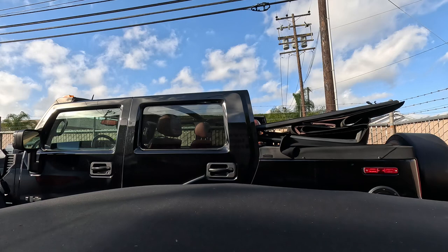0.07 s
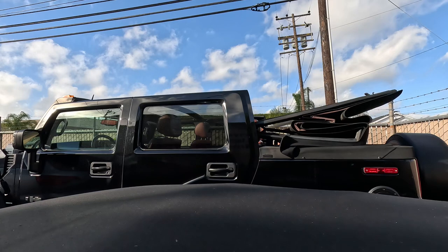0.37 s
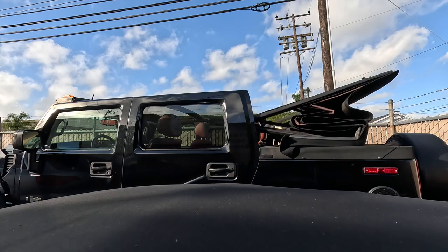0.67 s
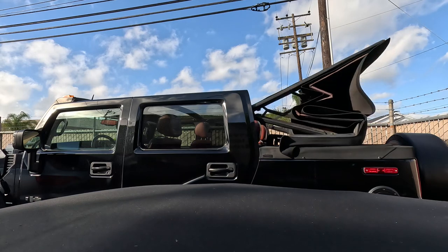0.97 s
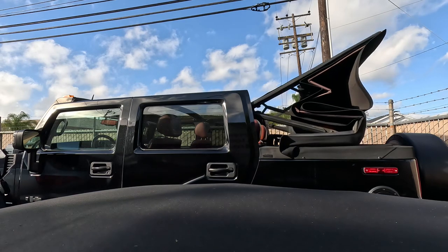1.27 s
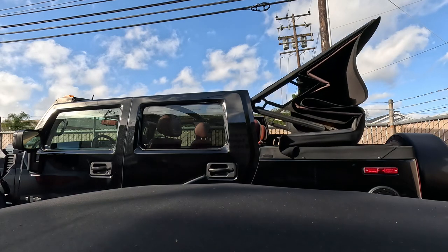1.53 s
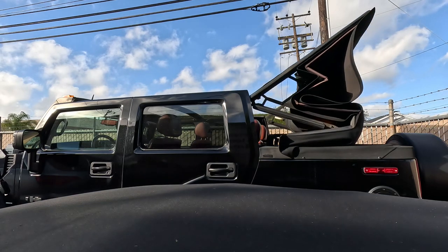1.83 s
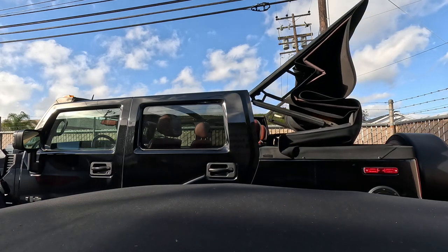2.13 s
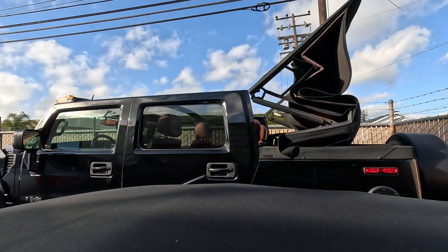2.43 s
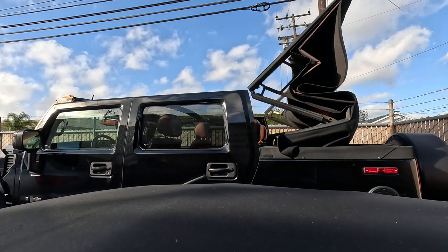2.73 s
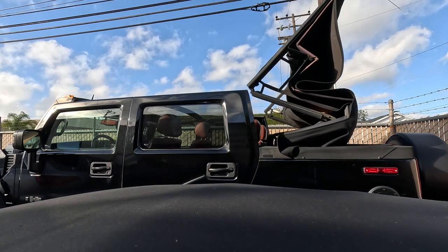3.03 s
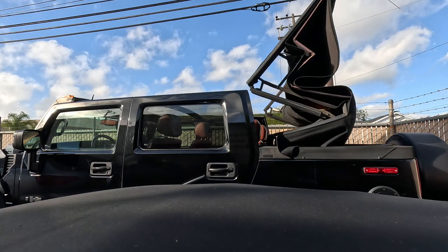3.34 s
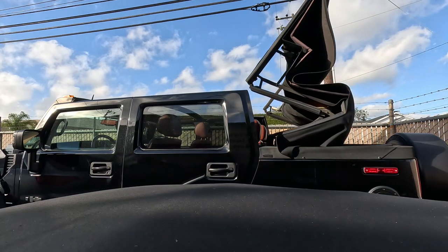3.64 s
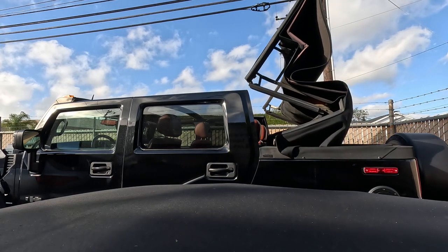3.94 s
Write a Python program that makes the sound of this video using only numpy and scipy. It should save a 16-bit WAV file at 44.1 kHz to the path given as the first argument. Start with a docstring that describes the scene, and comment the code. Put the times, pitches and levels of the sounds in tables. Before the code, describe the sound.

An electric pump whines and hisses from the start, raising a truck's folding roof while the engine idles with a low, steady beat outdoors. The whine climbs in pitch from about 0.7 to 1.2 seconds, with one sharp click at 0.9. From 1.5 seconds it runs more quietly until the end at 4. The roof's joints give a faint knock at 2.6 seconds and a short rattle at 3.3.

```python
"""A pump whines over the low beat of a truck's eight-cylinder engine idling outdoors.
The electric pump pushes oil to raise the folding roof, and the oil hisses in time with its shaft.
As the load eases it speeds up, sliding its tones through the body panels' resonances, then runs on quietly.
The roof's joints click once sharply, then give a faint knock and a short rattle."""
import sys
import numpy as np
from scipy import signal
from scipy.fft import rfft, irfft
from scipy.io import wavfile

SR = 44100
rng = np.random.default_rng(int(sys.argv[2]) if len(sys.argv) > 2 else 0)


def file_out(sig):
    """Save sig as 16-bit WAV at sys.argv[1]."""
    # one column per channel
    cols = np.atleast_2d(sig).T
    # limit, then scale
    lim = np.clip(cols, -1, 1)
    pcm = np.round(lim * 32767).astype(np.int16)
    wavfile.write(sys.argv[1], SR, pcm)


N = 176400
T, HZ = np.arange(N) / SR, np.fft.rfftfreq(N, 1 / SR)

# How hard the pump works: time_s, pressure_ripple_db, shaft_buzz_db, oil_hiss_db
PUMP_EFFORT = [(0, -50.5, -58.5, -5.5), (.6, -51.5, -59, -6), (.68, -49, -63, -4.5),
               (.76, -46.5, -58.5, -2), (.95, -45, -59, 0), (1.2, -44, -57, -0.5), (1.36, -47, -59.5, -1.5),
               (1.45, -54, -61.5, -7), (1.7, -65, -67.5, -8.5), (2.5, -68, -73, -20), (4, -65, -72, -13.5)]
# Boost or cut of the pump's sound above about TREBLE_HZ: time_s, gain_db
PUMP_TREBLE = [(0, 7.5), (.58, 6), (.7, 3.5), (.9, -3), (1.3, -1.5), (1.7, -3), (4, -3)]
TREBLE_HZ = 1840


def amp(db):
    """Turns decibels into a number to multiply by."""
    return np.exp(np.asarray(db) * np.log(10) / 20)


def unit(x):
    """Scales a signal to an average strength (rms) of 1."""
    return x / np.sqrt(np.mean(x ** 2) + 1e-20)


def curve(table, column=1):
    """Draws straight lines between a table's moments, giving one value per sample."""
    columns = np.transpose(table)
    return np.interp(T, columns[0], columns[column])


def colour(table, hz):
    """Looks up a table's value at any pitch, with octaves evenly spaced."""
    pitches, values = np.transpose(table)
    return np.interp(np.log(hz + 1), np.log(pitches + 1), values)


def wander(rate_hz):
    """A smooth random drift of strength 1, mostly slower than rate_hz."""
    points = rng.standard_normal(1024)
    drift_hz = np.fft.rfftfreq(1024, T[-1] / 1024)
    smooth = irfft(rfft(points) / (1 + (drift_hz / rate_hz) ** 2))
    return np.interp(T, np.linspace(0, T[-1], 1024), unit(smooth))


def stereo(hz, mono_below_hz=453):
    """How alike left and right are at a pitch, and their gains; deep bass is the same in both."""
    # Left against right, before the bass is centred: pitch_hz, likeness (0-1), left_minus_right_db
    sides = [(123, 1, 1), (300, 0.91, -0.7), (600, 0.83, -1), (1200, 0.8, -1.1), (2400, 0.6, -0.4),
             (4500, 0.54, .2), (9000, 0.63, 2)]
    sides = np.array(sides)
    apart = hz ** 2 / (hz ** 2 + mono_below_hz ** 2)
    lean_db = apart * colour(sides[:, ::2], hz) / 2
    likeness = 1 - apart * (1 - colour(sides[:, :2], hz))
    return np.clip(likeness, 0, 1), amp([lean_db, -lean_db])


def noise(spectrum, extra_db=0):
    """Stereo noise whose level at each pitch follows a table, plus extra_db."""
    likeness, gains = stereo(HZ)
    mid, side = rfft(rng.standard_normal((2, N)))
    side = side * np.sqrt((1 - likeness) / (1 + likeness))
    left_right = np.array([mid + side, mid - side]) * gains
    return irfft(left_right * amp(colour(spectrum, HZ) + extra_db), N) * np.sqrt(SR / 2)


def body_panels(hz):
    """The truck's panels strengthen some pitches and weaken others; gives the change in dB."""
    # Panel resonances and dips: pitch_hz, width_hz, gain_db
    resonances = [(244.7, 17.7, 21.5), (284.7, 15, 12), (318.6, 28, 6), (534.2, 38, 10), (682.5, 38, 9.5),
                  (810, 18, 6.5), (845, 57, -12), (918, 81, 9.5), (1190, 47, 8), (1270, 35, -2.5),
                  (1331.5, 31, 6.5), (1376, 20, 14), (1404, 41, -9), (1585, 85, 7.5), (1697, 43, 1.5),
                  (1943, 24, 5.5), (2030, 74, -6.5), (2100, 30, 11.5), (2260, 100, 8.5), (2460, 25, 6),
                  (2488, 92, -21), (3100, 260, -31)]
    return sum(db / (1 + (2 * (hz - centre) / width) ** 2) for centre, width, db in resonances)


def pump_whine(speed_hz, shaft_angle, lobes=6):
    """Tones at multiples of the shaft speed; every sixth is the pressure ripple of the pump's lobes."""
    # Overall tone of the whine: pitch_hz, gain_db
    whine_shape = [(150, 3), (240, -2), (400, -3), (800, -8.5), (1200, -4), (1800, -9.5), (2400, -9.5),
                   (3000, -12), (4000, -11)]
    # Tones that stand out: shaft_multiple (rounded below), loaded_gain_db, eased_gain_db
    standouts = [(5, -2, 1), (6, -0.5, 1.5), (7, 4.5, 4.5), (11, 6, -8.5), (12, 5.5, 2), (13, 10.5, 4),
                 (17, 9, 8.5), (18, 4, -0.5), (21, 1.5, 5), (23, 6.5, 3.5), (24, -2, 4.5), (25, 5, 7),
                 (26, 1, 6.5), (27, -10, -4), (29, 5.5, 2), (30, -3, 1), (31, -16, 3), (32, -10, 5.5),
                 (35, 3.5, 5), (36, -3, 2.5), (38, -5, -2), (41, -5, -5), (42, 1, 0.5), (47, 2, 4),
                 (48, 0.5, -2.5), (51, 2, -10), (52, 5, -2), (53, 9, -9), (54, 7, -10), (60, -2.5, -19),
                 (65.4, 15, -4)]
    # The motor's own hum, the same at any load: shaft_multiple, level_db
    motor_hum = [(5, -51.5), (6, -56.5), (11, -56.5), (12, -64), (13, -59.5), (17, -63), (18, -63),
                 (19, -66)]
    ease_at_s, ease_length_s = 0.72, 0.029
    eased = np.clip(.5 + (T - ease_at_s) / ease_length_s, 0, 1)  # 0 under load, 1 afterwards
    ripple_db, buzz_db = curve(PUMP_EFFORT, column=1), curve(PUMP_EFFORT, column=2)
    treble_db = curve(PUMP_TREBLE)
    grid_hz = np.arange(SR // 8)
    body_db = colour(whine_shape, grid_hz) + body_panels(grid_hz)
    standout_db = {round(k): loaded + (light - loaded) * eased for k, loaded, light in standouts}
    hum = {round(k): amp(db) for k, db in motor_hum}
    out = np.zeros((2, N))
    for k in range(4, 66):
        hz = k * speed_hz
        flutter_db = (1.5 + 2 * eased) * wander(7.5)
        db = buzz_db + flutter_db if k % lobes else ripple_db + flutter_db / 2
        db += standout_db.get(k, 0) + np.interp(hz, grid_hz, body_db)
        db += treble_db / (1 + (TREBLE_HZ / hz) ** 4)
        strength = np.sqrt(2 * (amp(db) ** 2 + hum.get(k, 0) ** 2))
        wobble = 0.27 * eased * np.sqrt(hz / 1000) * wander(14)  # high tones turn rough as the load eases
        phase = k * shaft_angle + wobble + 2 * np.pi * rng.random()
        likeness, gains = stereo(hz.mean())
        spread = np.arccos(likeness) / 2 * wander(1.1)  # left and right drift out of step
        out += gains[:, None] * strength * np.sin([phase + spread, phase - spread])
    return out


def oil_hiss(shaft_angle, pulsing=0.31, panel_share=0.21):
    """Pumped oil hisses, swelling once per shaft turn, lightly coloured by the panels."""
    # Tone of the moving oil: pitch_hz, level_db (per Hz)
    hiss_shape = [(100, -66), (260, -70.5), (520, -81), (800, -85), (1150, -73.5), (1800, -80.5),
                  (2350, -80.5), (3200, -86), (4500, -100), (8000, -114), (11000, -122), (14000, -130)]
    hiss = noise(hiss_shape, panel_share * body_panels(HZ)) * amp(curve(PUMP_EFFORT, column=3))
    hiss *= 1 + pulsing * np.cos(shaft_angle)
    treble = signal.sosfiltfilt(signal.butter(2, TREBLE_HZ, "high", fs=SR, output="sos"), hiss)
    return hiss + treble * (amp(curve(PUMP_TREBLE)) - 1)


def valve_sizzle(shaft_angle, pulsing=0.6):
    """Oil squeezing through the valve makes a fine sizzle that pulses with the shaft."""
    # Tone of the sizzle: pitch_hz, level_db (per Hz)
    sizzle_shape = [(2000, -130), (4300, -102), (6000, -112), (9000, -118), (11200, -107), (12200, -116),
                    (13000, -114), (14000, -126)]
    # How the sizzle rises and falls: time_s, gain_db
    loudness = [(0, -4), (.45, -9), (.7, -4), (1.1, -2), (1.24, -1.5), (1.4, -5), (1.6, -22), (4, -32)]
    return noise(sizzle_shape) * amp(curve(loudness)) * (1 + pulsing * np.cos(shaft_angle))


def pump():
    """One slightly unsteady shaft sets the pace of the whine, the hiss and the sizzle."""
    # Speed of the pump's shaft: time_s, turns_per_s
    shaft_speed = [(0, 44.4), (.3, 45.2), (.58, 45.2), (.73, 46.1), (.85, 48.4), (.93, 50.8), (1.03, 53.8),
                   (1.1, 55.7), (1.2, 56.9), (1.29, 56.6), (1.4, 54.5), (1.52, 53), (1.8, 55.3),
                   (2.1, 54.8), (2.35, 56.6), (3, 57.9), (4, 58.8)]
    speed_hz = curve(shaft_speed) * (1 + 0.00095 * wander(15.3))
    shaft_angle = 2 * np.pi * np.cumsum(speed_hz) / SR
    return pump_whine(speed_hz, shaft_angle) + oil_hiss(shaft_angle) + valve_sizzle(shaft_angle)


def engine(cylinders=8, waver_db=.5, pulsing=0.38):
    """The exhaust beats and puffs with each firing; uneven cylinders add a limp to the rhythm."""
    # Pace of the idle: time_s, firings_per_s
    idle = [(0, 38.5), (.3, 38.8), (.9, 38.1), (1.3, 39.5), (1.7, 38.4), (1.9, 37.3), (2.3, 39.1),
            (2.7, 39), (3.3, 38.7), (3.55, 37.3), (4, 38.2)]
    # Exhaust tones (in one cycle each cylinder fires once): cycle_multiple, level_db
    exhaust = [(7, -46), (8, -25.5), (9, -50), (11, -34), (13, -45), (16, -41), (19, -49), (21, -51),
               (22, -54), (24, -38.7), (27, -46), (29, -48.5), (30, -53), (32, -46), (35, -55)]
    # Tone of the engine's rumble: pitch_hz, level_db (per Hz)
    rumble_shape = [(10, -80), (24, -45), (38, -54), (62, -67), (90, -57), (115, -63.5), (155, -60),
                    (200, -69), (280, -76.5), (400, -87), (1000, -100), (4000, -125)]
    firing_angle = 2 * np.pi * np.cumsum(curve(idle)) / SR
    tones = np.zeros(N)
    for k, db in exhaust:
        offset = 2 * np.pi * rng.random() * (k % cylinders > 0)  # only the firing tones line up
        tones += amp(db + waver_db * wander(1.5)) * np.cos(k * firing_angle / cylinders + offset)
    puffs = noise(rumble_shape) * (1 + pulsing * np.cos(firing_angle))
    return np.sqrt(2) * tones + puffs


def outdoor_air(swell_db=1):
    """A steady outdoor wash of noise that gently swells and sinks."""
    # Tone of the background: pitch_hz, level_db (per Hz)
    air_shape = [(30, -90), (280, -70.5), (420, -76.5), (660, -76.5), (850, -82.5), (1020, -77.5),
                 (1250, -88.5), (1600, -86), (2700, -90.5), (4100, -98), (5200, -101), (7500, -102),
                 (8500, -108), (10500, -113), (14000, -128)]
    return noise(air_shape) * amp(swell_db * wander(3.0))


def roof_joints(attack_s=.0006, echo_db=-17, echo_fade_s=0.21):
    """Each joint slips with a short crack, rings briefly and echoes off the truck."""
    # Slips of the joints: start_s, level_db, fade_s (time to drop 60 dB), brightness_db_per_octave
    slips = [(0.9177, -25.5, 0.021, -1.5), (2.6005, -41.5, 0.06, -5), (3.2665, -44, 0.07, 3),
             (3.2785, -53, .07, 4), (3.2895, -52, .06, 4)]
    # Tone of a crack: pitch_hz, gain_db
    crack_shape = [(100, -30), (300, -13), (900, 1), (1300, 4), (3000, 1.5), (4600, -9.5), (5300, -15.5),
                   (7500, -20), (9000, -28), (14000, -40)]
    # Ringing tones of the roof's linkage: pitch_hz, gain_db, fade_s
    ring_tones = [(1230, -11, 0.024), (1540, -4.5, 0.061), (1830, -11, 0.081), (2805, -10, 0.026),
                  (3300, -19, 0.072), (4414, -11, 0.0076), (10360, -25.5, 0.017)]
    octaves = np.log2(np.maximum(HZ, 500) / 2500)  # brightness tilts around 2500 Hz, flat below 500 Hz
    out = np.zeros((2, N))
    for start_s, level_db, fade_s, brightness in slips:
        age = np.maximum(T - start_s, 0)
        direct = amp(-60 * age / fade_s)
        echo = amp(echo_db - 60 * age / echo_fade_s)
        crack = unit(noise(crack_shape, brightness * octaves)) * (direct + echo)
        ring = sum(amp(db - 60 * age / ring_s) * np.sin(2 * np.pi * hz * age)
                   for hz, db, ring_s in ring_tones)
        out += amp(level_db) * np.minimum(age / attack_s, 1) * (crack + ring)
    return out


def scene():
    """The pump, the roof's joints and the engine together in the open air."""
    return pump() + roof_joints() + engine() + outdoor_air()


def record(dry, fade_s=.004, cutoff_hz=14200):
    """Fades both ends and removes the very highest treble."""
    fade = np.minimum(np.minimum(T, T[::-1]) / fade_s, 1)
    lowpass = signal.firwin(511, cutoff_hz, window=("kaiser", 9), fs=SR)
    return signal.oaconvolve(dry * fade, lowpass[None], "same")


dry = scene()
out = record(dry)
file_out(out)
```